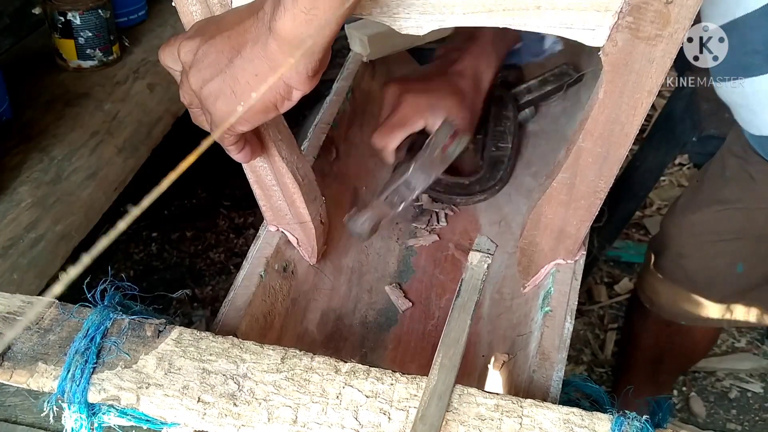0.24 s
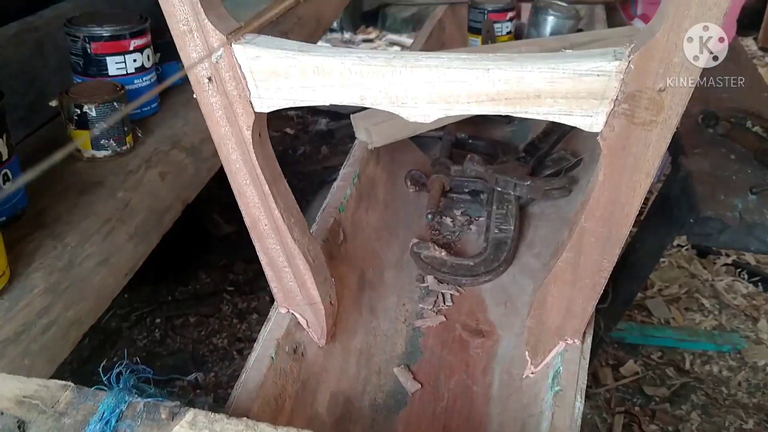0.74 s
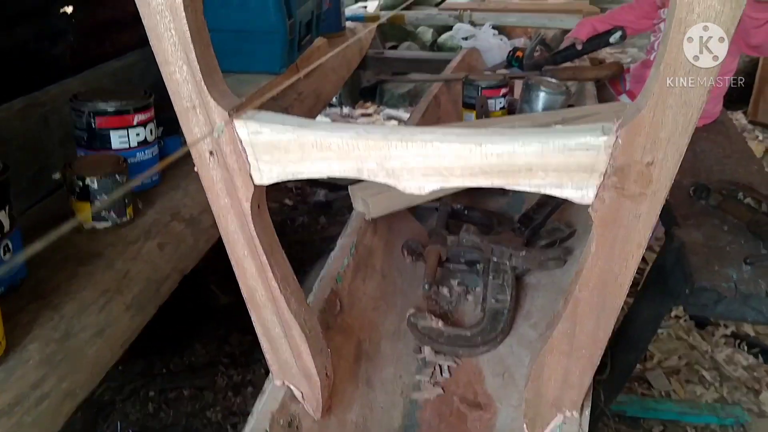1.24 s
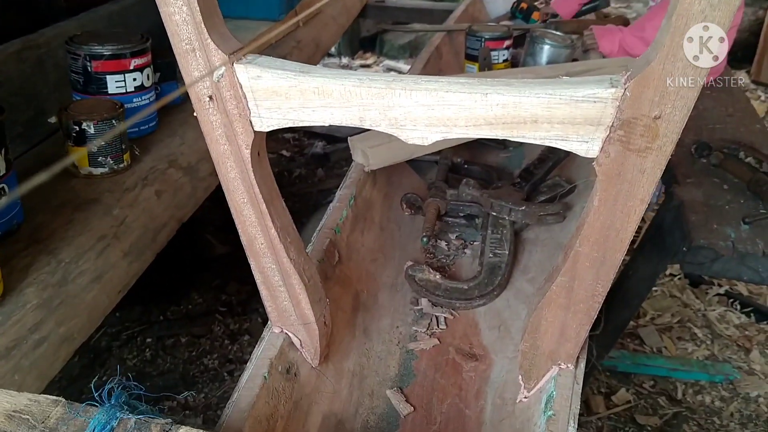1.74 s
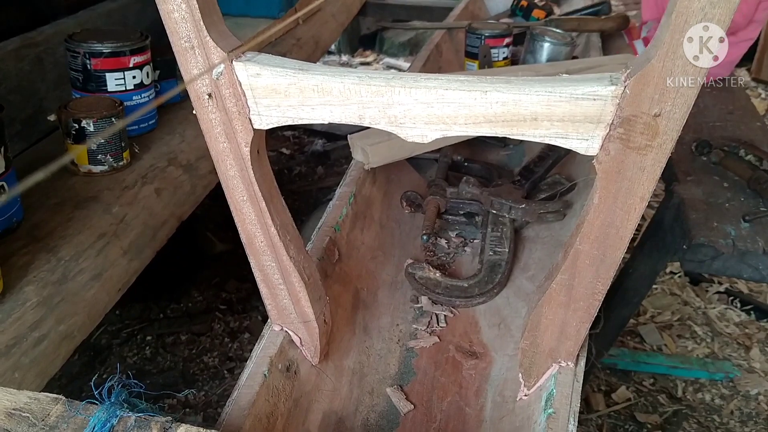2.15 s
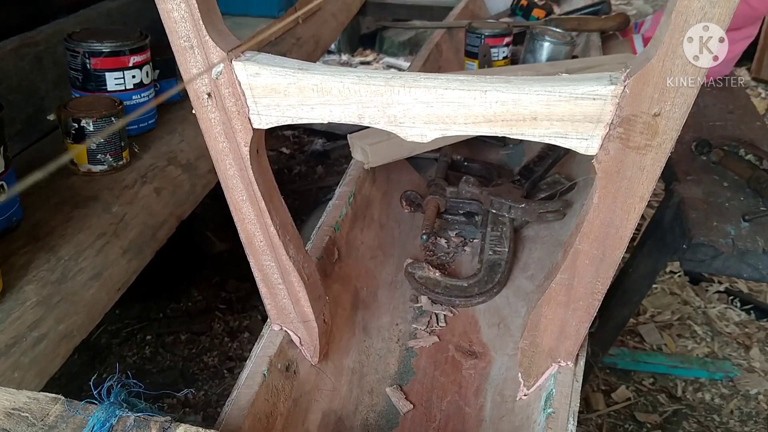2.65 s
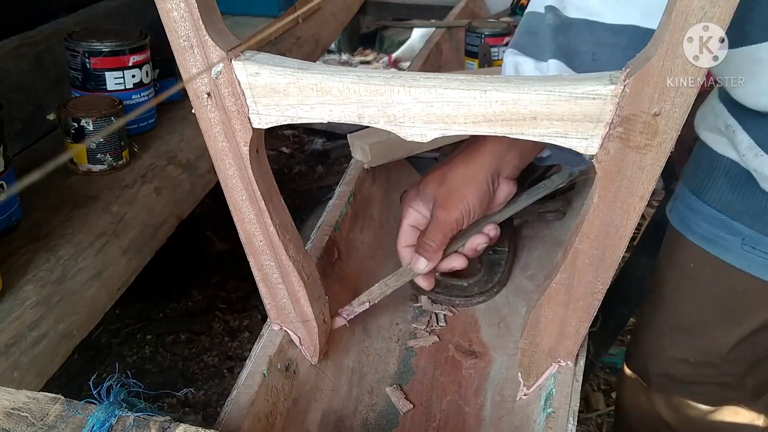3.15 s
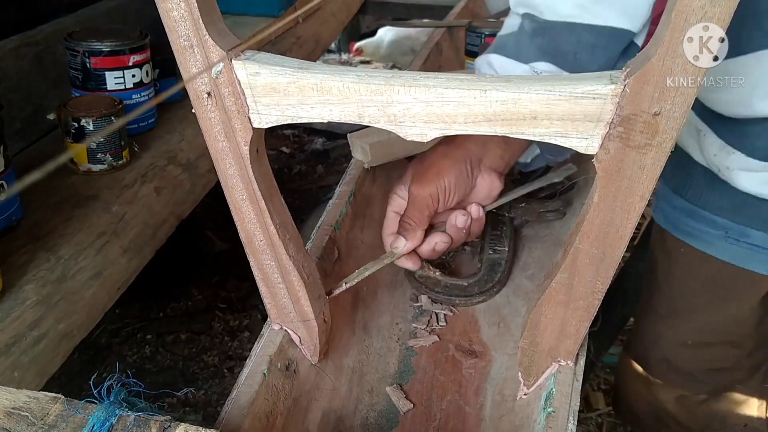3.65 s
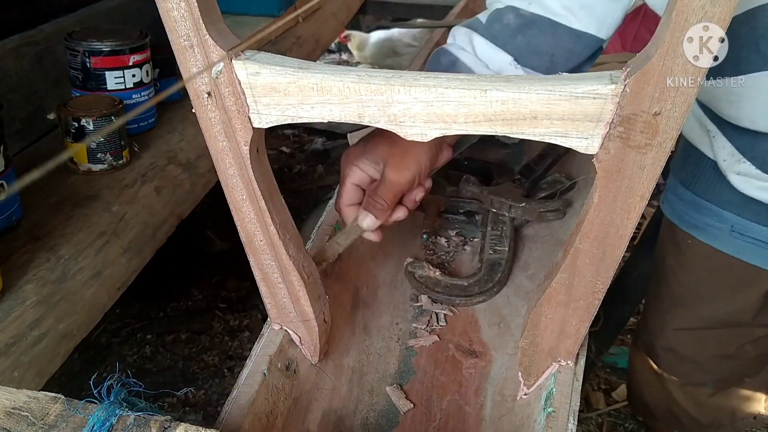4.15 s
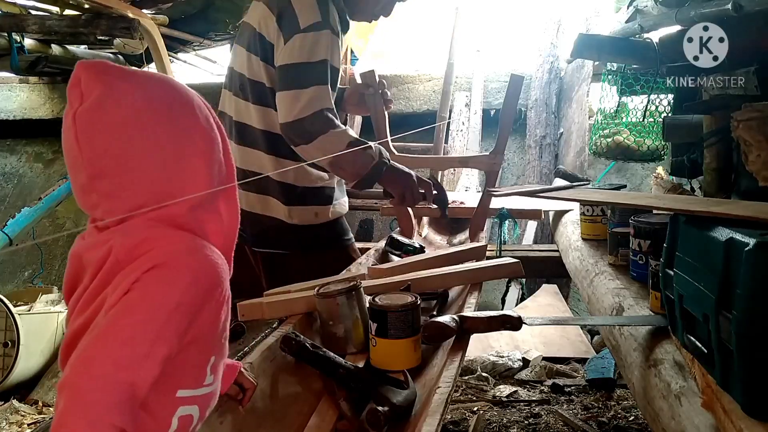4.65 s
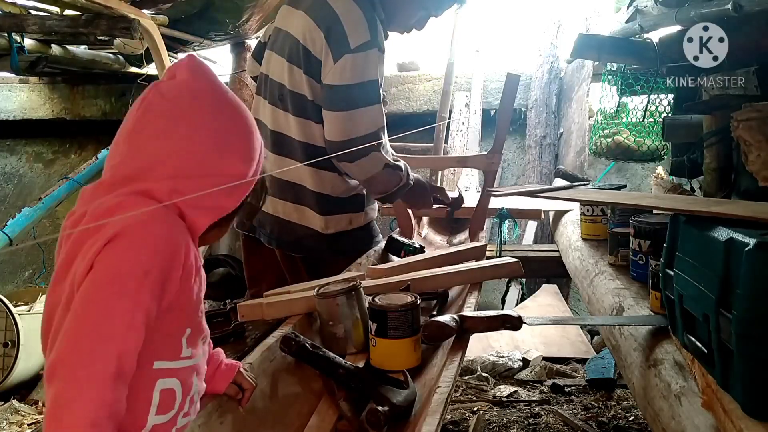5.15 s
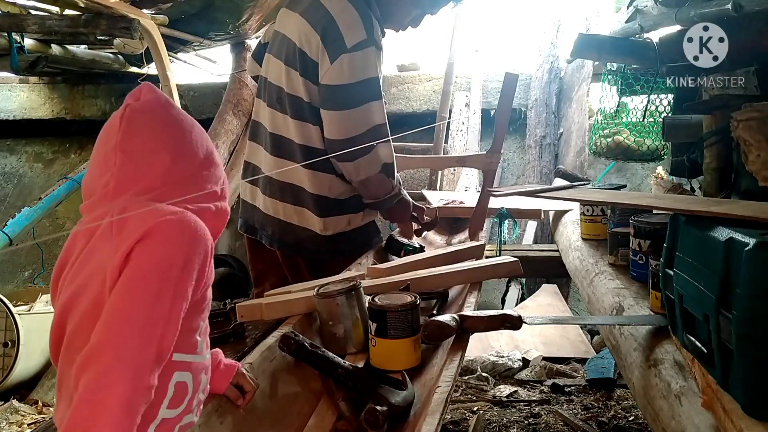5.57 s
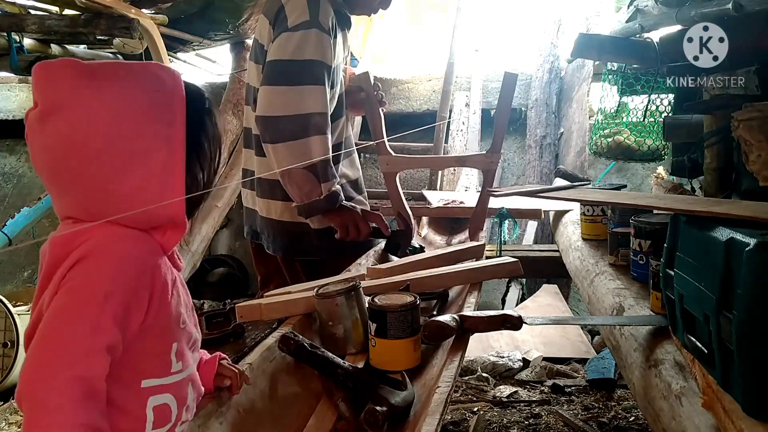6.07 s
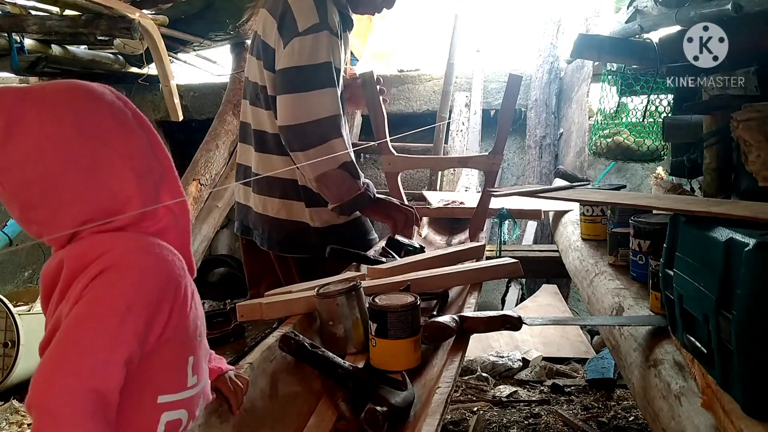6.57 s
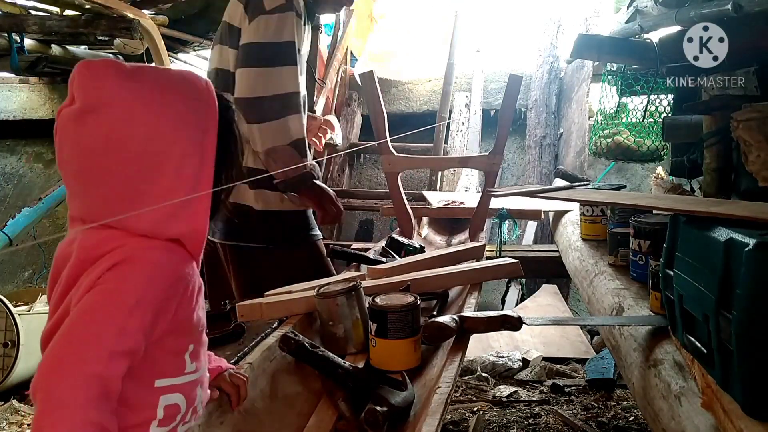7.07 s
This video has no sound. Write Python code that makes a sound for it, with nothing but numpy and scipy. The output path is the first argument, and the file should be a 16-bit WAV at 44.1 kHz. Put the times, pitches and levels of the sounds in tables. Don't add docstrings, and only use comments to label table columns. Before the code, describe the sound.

Two sharp hammer blows, loose woody clatter and tool taps, then a short run of heavier strikes, close up in a quiet breezy yard.

```python
import sys
import numpy as np
from scipy import signal
from scipy.fft import rfft, irfft
from scipy.io import wavfile
from scipy.ndimage import uniform_filter1d, minimum_filter1d, map_coordinates

SR = 44100
rng = np.random.default_rng(int(sys.argv[2]) if len(sys.argv) > 2 else 0)


def boost(x):
    u = np.asarray(x, float) / 20
    return 10 ** u


def pcm_store(signal):
    levels = np.round(np.clip(np.atleast_2d(signal), -1, 1) * 32767)
    wavfile.write(sys.argv[1], SR, levels.astype(np.int16).T)


N = 322621

# frequency in Hz, width in Hz, level in dB.
PLANK = [(1180, 60, 10), (1850, 25, -5), (2050, 33, -21), (2360, 38, 2), (2680, 50, -14), (4160, 40, -17),
         (5800, 35, -14)]
# frequency in Hz, level in dB per Hz.
PLANK_TONE = [(120, -85), (200, -19.5), (353, -5.5), (601, -13.5), (1210, -16), (2050, -11.5), (2610, -17),
              (14900, -50.5), (16000, -46)]
# frequency in Hz, level in dB per Hz.
BENCH_TONE = [(120, -45), (200, 5), (1300, -2.5), (2650, -6.5), (3690, -13), (9060, -26.5), (11300, -30),
              (14900, -31), (16000, -23)]
# frequency in Hz, level in dB per Hz.
SCRAPE_TONE = [(290, -30), (500, -13), (621, -22), (1060, -13), (3590, -6.5), (10100, -34), (14900, -31),
               (16000, -34)]
# frequency in Hz, width in Hz, level in dB.
SCRAPE_PEAKS = [(1880, 87, 3), (2090, 34, -7), (2450, 32, 0), (3550, 99, -3), (4030, 48, -12),
                (4540, 99, 0)]
# frequency in Hz, level in dB per Hz.
HISS = [(2940, -30), (5000, -4.5), (6570, -12), (8050, -7.5), (12000, -13.5), (15000, -7), (15900, -9),
        (16400, -57)]
# frequency in Hz, level in dB, t60 in seconds.
BEAM_FIRST = [(775, -15, 5.0), (1254, -8, 0.45), (2288, 0, 0.08), (2710, -3, 0.064), (3047, -14, 0.17),
              (3402, -11, 0.17), (4000, -6, 0.1), (4177, -9, 0.061)]
BEAM_SECOND = [(883, -5, 2.3), (1405, -4, 0.3), (2116, 0, 0.098), (2358, 0, 0.11), (2751, -2, 0.075),
               (3370, -4, 0.12), (3892, -13, 0.29), (4495, -11, 0.12)]
BEAM_THIRD = [(1400, 1, 0.13), (1954, -9, 0.095), (2358, -1, 0.087), (2902, -7, 0.11), (3165, -7, 0.11),
              (3350, -14, 1.7), (4032, -6, 0.1), (4899, -10, 0.072)]
TOOL_MODES = [(1238, 0, .07), (1384, -4, .07), (1938, -1, 0.088), (2837, -5, 0.089), (3130, -4, .06),
              (3603, 4, 0.067), (4441, -2, 0.097), (6770, -1, .035), (8300, -8, .03)]
CLIP_MODES = [(1147, -3, 0.031), (1733, -11, 0.042), (3050, 0, 0.023), (4479, -7, 0.063), (6158, -28, 5.0),
              (7278, -20, 0.023)]
PEG_MODES = [(4210, -11, 0.068), (5066, 0, 0.0091), (5475, -14, 0.069), (6169, -6, 0.029),
             (7900, -17, 0.046)]
NAIL_FIRST = [(1500, 0, .04), (4600, 4, .06), (6150, 0, .06), (6767, 0, .04), (7461, -5, .03),
              (9426, 0, .031), (12660, -2, .035)]
NAIL_SECOND = [(1599, 0, 0.034), (2105, -7, 0.055), (6040, -16, 0.19), (9399, -2, 0.097),
               (10450, -21, 0.081), (12600, -10, 0.029)]
BLOCK_FIRST = [(1357, -0.5, 0.055), (1700, -2, .06), (2724, -7, .07), (3472, -7.5, 0.043), (3740, -10, .04)]
BLOCK_SECOND = [(1637, -0.5, 0.05), (3020, -8, 0.048), (3575, -20, 0.071), (4253, -24, 0.06)]
RAP_FIRST = [(1179, 0, 0.033), (1825, -13, 0.073), (2051, -18, 5.0), (2805, -3, 0.018), (3736, -6, 0.013),
             (4037, -26, 0.089)]
RAP_SECOND = [(1061, -3, 0.13), (1820, 0, 0.062), (2422, -17, 0.32), (4102, -10, 0.014)]


def unit(x):
    return x / np.sqrt(np.mean(x ** 2) + 1e-20)


def along(points, hz):
    f, v = np.transpose(points)
    return np.interp(np.log(hz + 1), np.log(f + 1), v)


def curves(rows):
    s, *cols = np.transpose(rows)
    return [np.interp(np.arange(N) / SR, s, c) for c in cols]


def wobble(rate, count=N):
    knots = rng.standard_normal(int(count * rate / SR) + 4)
    return map_coordinates(knots, [np.arange(count) * rate / SR])


def causal(gain):
    cepstrum = irfft(np.log(gain + 1e-6))
    half = len(cepstrum) // 2
    cepstrum[1:half] *= 2
    cepstrum[half + 1:] = 0
    return np.exp(rfft(cepstrum))


def rush(spectrum, patchy_db):
    hz, _, z = signal.stft(rng.standard_normal(N + 512), SR, nperseg=512)
    field = uniform_filter1d(rng.standard_normal(z.shape), size=6, axis=0)
    field = uniform_filter1d(field, size=10, axis=1)
    z = z * boost(patchy_db * unit(field) + along(spectrum, hz)[:, None])
    return unit(signal.istft(z, SR, nperseg=512)[1][:N])


def strikes(rows, modes, tone, bass_db, ring_s, ring_db, bend, rattle_db, treble_life, attack, blow=6,
            damping_hz=45):
    bass_lag = 0.49
    bright_lasts = 0.014
    out, t = np.zeros(N + SR), np.arange(5120) / SR
    f = np.fft.rfftfreq(2 * len(t), 1 / SR)

    def peak(hz, width):
        return f * width / np.abs(hz * hz - f * f + 1j * f * width)

    high = 1 / (1 + (3000 / (f + 1)) ** 6)
    low = 1 / (1 + (f / 700) ** 6)
    for s, db, main_hz, treble_db in rows:
        t60 = ring_s * (1 + bright_lasts * treble_db)
        thump_db = bass_db - bass_lag * (db + 30)
        lift = 0
        for hz, width, level_db in modes:
            mode_gain = boost(level_db - along(tone, hz) + rng.normal(0, 0.58))
            lift = lift + mode_gain * peak(hz, width + damping_hz)
        lift = lift / len(modes) + 1.07 * peak(main_hz, 120)
        colour = boost(along(tone, f)) * (1 + boost(ring_db) * lift)
        bands = ((low, thump_db, 1.2), (1 - low - high, 0, 1.01), (high, treble_db, treble_life))
        for band, rel_db, life in bands:
            fade = boost(-60 * (t / (t60 * life)) ** bend) * (1 - np.exp(-t / attack))
            rattle = boost(rattle_db * wobble(334, count=len(t)))
            shake = fade * rattle * rng.standard_normal(len(t))
            shake[round(attack * SR) + 2] += blow
            sound = irfft(rfft(shake, 2 * len(t)) * causal(colour * band))[:len(t)]
            loudest = np.sqrt(uniform_filter1d(sound ** 2, size=260).max())
            out[round(s * SR):][:len(t)] += boost(db + rel_db - 6.5) * sound / loudest
    return out[:N]


def frame_blows():
    # start in seconds, peak in dB, main resonance in Hz, treble in dB.
    near = [
        (0.146, -10.5, 1170, -4.5),
        (0.155, -13, 1250, -5.5),
        (0.311, -8.5, 1180, -8),
        (0.321, -10, 1250, -7),
    ]
    # frequency in Hz, width in Hz, level in dB.
    frame = [(1250, 31, 0), (1500, 15, 7.5), (2360, 31, -15), (2780, 180, -1.5), (3550, 57, -21),
             (3840, 44, -35), (4100, 46, -34), (4740, 42, -24), (8200, 83, -28), (9300, 100, -19)]
    # frequency in Hz, level in dB per Hz.
    frame_tone = [(59, -82), (100, -38), (315, 2), (950, -13.5), (1250, -11.5), (2170, -13.5), (3780, -20),
                  (7610, -37), (15000, -46), (16000, -49)]
    return strikes(near, frame, frame_tone, bass_db=-5.5, ring_s=0.09, ring_db=4, bend=1.95,
                   rattle_db=0.0, treble_life=1.0, attack=0.00011)


def tighten():
    # start in seconds, start in Hz, end in Hz, level in dB, length in seconds.
    glides = [
        (.146, 1080, 1370, -17, 0.0229),
        (0.309, 1063, 1500, -21.5, 0.0135),
    ]
    out = np.zeros(N)
    for s, start_hz, end_hz, db, length in glides:
        u = np.linspace(0, 1, int(length * SR))
        phase = 2 * np.pi * np.cumsum(start_hz + (end_hz - start_hz) * u) / SR
        out[round(s * SR):][:len(u)] += boost(db + 3) * np.sqrt(1 - u ** 3) * np.sin(phase)
    return out


def beam_blows():
    # start in seconds, peak in dB, main resonance in Hz, treble in dB.
    drive = [
        (5.51, -8.5, 1240, -5.5),
        (5.687, -8.5, 1240, -6),
    ]
    glance = [
        (5.3245, -8.5, 860, -3),
    ]
    rebound = [
        (5.37, -23.5, 1150, -1.8),
    ]
    # frequency in Hz, width in Hz, level in dB.
    beam = [(1250, 59, -27), (1530, 17, 19), (2140, 48, 7), (2270, 57, 21), (2740, 22, -15), (3460, 86, 19),
            (4170, 50, 10), (4150, 97, 9), (4780, 47, -9), (5350, 42, 2)]
    # frequency in Hz, level in dB per Hz.
    beam_tone = [(59, -49), (100, -33), (328, -2.5), (1250, -0.5), (1760, -7.5), (2320, -3.5), (3400, -7.5),
                 (7610, -27), (15000, -36), (16000, -60)]
    hits = strikes(drive, beam, beam_tone, bass_db=0, ring_s=.1, ring_db=-16, bend=1.45,
                   rattle_db=2.5, treble_life=0.96, attack=0.0005)
    swell = strikes(glance, beam, beam_tone, bass_db=-1, ring_s=0.097, ring_db=-13, bend=1.46,
                    rattle_db=1.0, treble_life=0.83, attack=0.004, blow=0)
    bounce = strikes(rebound, beam, beam_tone, bass_db=-17, ring_s=0.046, ring_db=-13, bend=1.3,
                     rattle_db=4.0, treble_life=0.93, attack=0.00045)
    return hits + swell + bounce


def cracks():
    # start in seconds, peak in dB, frequency in Hz.
    snaps = [
        (2.6236, -19, 4200),
        (4.5716, -17, 2500),
        (.6878, -28, 4600),
        (5.9385, -26, 5000),
        (6.3585, -28, 6000),
        (.9285, -30, 3500),
        (4.5405, -38, 3300),
        (1.8085, -20, 1900),
        (2.4075, -16, 1700),
    ]
    decay_cycles = 1.3
    out, t = np.zeros(N + SR), np.arange(SR // 100) / SR
    for s, db, hz in snaps:
        swing = np.exp(-hz * t / decay_cycles) * np.sin(2 * np.pi * hz * t)
        out[round(s * SR):][:len(t)] -= boost(db + 3) * swing
    return out[:N]


def chimes():
    # start in seconds, level in dB, swell in seconds, choke in seconds, modes that ring.
    struck = [(5.327, -21, .004, .06, BEAM_FIRST), (5.5105, -22, .002, .065, BEAM_SECOND),
              (5.688, -25.5, 0.0022, .065, BEAM_THIRD), (4.572, -27, 0.0018, .04, TOOL_MODES),
              (.6875, -37, .0004, .022, NAIL_FIRST), (.7028, -37, .0006, .03, NAIL_SECOND),
              (2.4062, -19, 0.0005, .016, BLOCK_FIRST), (2.418, -14.5, .001, 0.032, BLOCK_SECOND),
              (2.623, -35, .0004, .03, CLIP_MODES), (1.757, -42, .0008, .025, PEG_MODES),
              (.924, -29, .001, .04, RAP_FIRST), (1.114, -28, .0008, .03, RAP_SECOND)]
    out, t = np.zeros(N + SR), np.arange(SR // 10) / SR
    for s, db, swell, choke, modes in struck:
        for hz, mode_db, t60 in modes:
            loss_db = 60 * t / np.clip(t60, .01, .12) + 60 * (t / choke) ** 5
            unsteady_db = 1.9 * wobble(250, count=len(t))
            fade = boost(db + mode_db - loss_db + unsteady_db) * (1 - np.exp(-t / swell))
            phase = 2 * np.pi * (hz * t + rng.random()) + .35 * wobble(400, count=len(t))
            out[round(s * SR):][:len(t)] += fade * np.sin(phase)
    return out[:N]


def squeak():
    # start in seconds, length in seconds, slip rate in Hz, level in dB, friction noise share 0-1.
    slips = [
        (0.203, .034, 1100, -32, 0.87),
        (0.234, 0.036, 1076, -33.5, 0.55),
    ]
    # multiple of the slip rate, level in dB.
    orders = [(1, -6), (2, -2), (3, -6), (4, 0), (5, -8), (6, -22), (7, -19), (8, -15)]
    sag, rise = 0.041, 0.23
    out = np.zeros(N)
    grit = boost(3 * wobble(300)) * rush(SCRAPE_TONE, patchy_db=1)
    for s, length, rate_hz, db, share in slips:
        u = np.linspace(0, 1, int(length * SR))
        waver = .04 * share * wobble(700, count=len(u))
        phase = 2 * np.pi * np.cumsum(rate_hz * (1 + sag * (.5 - u) + waver)) / SR
        stack = np.zeros(len(u))
        for k, order_db in orders:
            stack += boost(order_db + 3.5 * wobble(200, count=len(u))) * np.sin(k * phase)
        swell = np.interp(u, [0, rise, 1], [0, 1, 0])
        at = round(s * SR)
        friction = share * grit[at:at + len(u)]
        out[at:at + len(u)] += boost(db) * swell * (unit(stack) + friction)
    return out


def plank_knocks():
    # start in seconds, peak in dB, main resonance in Hz, treble in dB.
    knocks = [
        (0.924, -22, 1500, -15),
        (0.939, -24, 1600, -15),
        (1.114, -22, 1890, -19),
        (1.126, -29.5, 1170, -5.5),
        (1.289, -29.5, 1250, -17),
        (5.101, -45, 2090, -7),
    ]
    return strikes(knocks, PLANK, PLANK_TONE, bass_db=-16.0, ring_s=0.04, ring_db=5, bend=1.57,
                   rattle_db=1.0, treble_life=1.0, attack=0.00035)


def rod_clatter():
    # start in seconds, peak in dB, main resonance in Hz, treble in dB.
    contacts = [(0.0, -22.5, 1240, -5.5), (1.757, -44, 1220, 2.5), (1.785, -21, 1470, -17.5),
                (1.807, -18.5, 2050, -21), (1.859, -38, 1220, -23), (1.889, -49, 1230, 4.5),
                (1.932, -35, 1040, -13.5), (3.798, -19, 1700, -15), (3.834, -30.5, 1140, -0.5),
                (3.859, -33, 1680, -3.5), (3.896, -29.5, 1820, -13), (3.925, -50.5, 1180, 7),
                (4.068, -31.5, 1370, -19), (4.125, -40, 1770, -6), (4.354, -38, 1650, -2.5)]
    # frequency in Hz, width in Hz, level in dB.
    rod = [(750, 13, -2.5), (1170, 81, 5), (1560, 53, 2), (1710, 94, -17), (2060, 99, -15), (2460, 46, -12),
           (2970, 32, -14), (4120, 23, -11), (5450, 73, -23)]
    return strikes(contacts, rod, PLANK_TONE, bass_db=-11.5, ring_s=0.047, ring_db=17.5, bend=1.37,
                   rattle_db=-0.5, treble_life=1.0, attack=0.00037)


def pings():
    # start in seconds, level in dB, upper mode in dB, t60 in seconds.
    bounces = [
        (0, -36, -26, .12),
        (1.128, -54.5, 12, 0.044),
        (1.787, -32.5, -10, 0.03),
        (1.809, -36.5, -11, 0.043),
        (2.428, -44, -16, 0.1),
        (3.798, -36, -3, 0.047),
        (3.835, -56, 16, .14),
        (3.889, -41, -11, 0.046),
        (3.927, -37, -18, 0.049),
    ]
    # start in seconds, frequency in Hz, level in dB, t60 in seconds.
    rings = [
        (.163, 8200, -34, .04),
        (0.18, 9350, -36, .04),
        (2.406, 4000, -33, 0.038),
        (1.787, 3350, -36, .03),
        (1.858, 1230, -37, .07),
        (1.932, 2250, -38, .03),
        (1.893, 7250, -50, .05),
        (5.945, 1450, -57.5, 1.4),
        (6.3805, 1700, -20, 0.024),
        (5.137, 530, -27.5, .022),
    ]
    blur_rad, blur_hz = .2, 25000
    out, t = np.zeros(N + SR), np.arange(SR // 3) / SR
    single_modes = list(rings)
    for s, db, upper_db, t60 in bounces:
        single_modes += [(s, 4370, db, t60), (s, 5750, db + upper_db, t60)]
    for s, hz, db, t60 in single_modes:
        unsteady_db = 2.5 * wobble(250, count=len(t))
        fade = boost(db - 60 * t / t60 + unsteady_db) * (1 - np.exp(-t / 0.00065))
        phase = 2 * np.pi * hz * t + (blur_rad + hz / blur_hz) * wobble(600, count=len(t))
        out[round(s * SR):][:len(t)] += fade * np.sin(phase)
    return out[:N]


def bench_contacts():
    # start in seconds, peak in dB, main resonance in Hz, treble in dB.
    taps = [
        (2.623, -33, 1180, 5),
        (4.185, -42, 2360, 5.5),
        (4.508, -54, 1570, -3),
        (4.539, -40, 1600, -4),
        (4.608, -36.5, 2650, -8),
        (4.699, -43.5, 1180, -2.5),
        (5.207, -41, 2450, -11),
        (5.263, -40, 1920, -4),
        (6.358, -25.5, 1180, -0.5),
        (6.38, -20, 1500, -4),
            (2.394, -42, 2500, 1),
    ]
    slaps = [
        (4.571, -18.5, 1240, 1),
        (5.938, -24, 1310, 1.5),
    ]
    # frequency in Hz, width in Hz, level in dB.
    bench = [(1240, 460, -27), (1920, 68, 8), (3350, 33, -9), (3560, 840, 7.5), (4550, 130, 0),
             (5330, 39, 3), (6190, 95, -32), (6450, 130, -5), (8800, 120, -7)]
    tapping = strikes(taps, bench, BENCH_TONE, bass_db=-15, ring_s=0.054, ring_db=1, bend=1.08,
                      rattle_db=-1, treble_life=0.95, attack=0.0003, blow=4.9)
    slapping = strikes(slaps, bench, BENCH_TONE, bass_db=-17.5, ring_s=0.06, ring_db=10, bend=1.35,
                       rattle_db=1.0, treble_life=0.73, attack=0.0014, blow=0)
    return tapping + slapping


def nail_clink():
    # start in seconds, peak in dB, main resonance in Hz, treble in dB.
    nails = [
        (0.6875, -34, 1530, 5.3),
        (0.7028, -35, 1560, 1),
    ]
    # frequency in Hz, width in Hz, level in dB.
    steel = [(1570, 42, -2), (4470, 45, 16), (5970, 34, 0), (6070, 35, 14), (6750, 54, 15),
             (9440, 42, 16.5), (10000, 25, -15), (12650, 130, 12)]
    return strikes(nails, steel, BENCH_TONE, bass_db=-24, ring_s=0.036, ring_db=-4, bend=1.3,
                   rattle_db=4.5, treble_life=1.1, attack=0.00026)


def block_drop():
    # start in seconds, peak in dB, main resonance in Hz, treble in dB.
    drops = [
        (2.4055, -16.5, 1380, -7),
        (2.418, -19, 1640, -6.5),
    ]
    # frequency in Hz, width in Hz, level in dB.
    block = [(1370, 24, -12), (1640, 33, 7), (2950, 54, -9), (3500, 29, -7), (4250, 72, -34),
             (5670, 29, -19)]
    # frequency in Hz, level in dB per Hz.
    block_tone = [(120, -55), (200, -22), (590, -28), (763, -12.5), (899, -21), (1650, -10.5),
                  (2020, -13.5), (3070, -15), (16000, -77)]
    return strikes(drops, block, block_tone, bass_db=-14, ring_s=.04, ring_db=3, bend=1.9,
                   rattle_db=2, treble_life=1.1, attack=.0008, blow=3)


def box_setdown():
    # start in seconds, peak in dB, main resonance in Hz, treble in dB.
    setdown = [
        (5.137, -16, 930, -18),
    ]
    # frequency in Hz, width in Hz, level in dB.
    box = [(522, 87, 4), (930, 100, -9), (1370, 75, 5), (1650, 140, 7), (2200, 410, -14)]
    # frequency in Hz, level in dB per Hz.
    box_tone = [(120, -46), (200, -32), (424, -12), (950, -0.5), (1180, -17.5), (2610, -6), (3070, -25),
                (4520, -25.5), (16000, -59)]
    return strikes(setdown, box, box_tone, bass_db=1, ring_s=0.041, ring_db=3, bend=1.13,
                   rattle_db=1.5, treble_life=3.0, attack=0.00071)


def catches():
    # start in seconds, peak in dB, main resonance in Hz, treble in dB.
    ticks = [(4.475, -51, 3550, -2), (4.494, -46, 3100, -2), (4.501, -46, 2000, 0), (4.512, -43, 3100, 1),
             (4.542, -37, 3170, -1), (5.224, -44, 1200, -4), (5.236, -46, 2450, -4), (5.291, -45, 2200, -3),
             (5.305, -45, 1900, -5), (5.322, -23, 1500, -12), (5.374, -26, 1600, -7),
             (5.391, -35, 1900, -12), (5.545, -27.5, 5500, -0.5), (5.567, -33.5, 1150, -15)]
    return strikes(ticks, SCRAPE_PEAKS, BENCH_TONE, bass_db=-19, ring_s=.03, ring_db=9, bend=1.2,
                   rattle_db=2.5, treble_life=0.8, attack=0.00069, blow=3)


def nudges():
    # start in seconds, peak in dB, main resonance in Hz, treble in dB.
    bumps = [
        (1.791, -26, 1600, -20),
        (1.823, -37, 1250, -20),
        (1.855, -40, 1900, -15),
        (1.938, -35.5, 1000, -20),
        (1.945, -39, 480, -25),
    ]
    return strikes(bumps, PLANK, PLANK_TONE, bass_db=-8.5, ring_s=0.028, ring_db=9, bend=1.3,
                   rattle_db=1.5, treble_life=.8, attack=0.00081, blow=4)


def scrapes():
    # start in seconds, end in seconds, level in dB.
    drags = [
        (4.472, 4.524, -48),
        (4.521, 4.576, -51),
        (5.16, 5.202, -51),
        (5.197, 5.262, -46),
        (5.255, 5.32, -48),
    ]
    t, f = np.arange(N) / SR, np.fft.rfftfreq(N, 1 / SR)
    stroke = np.zeros(N)
    for start, end, db in drags:
        progress = ((t - start) / (end - start)).clip(0, 1)
        stroke += boost(db) * np.sin(np.pi * progress) ** .3
    lift = 1
    for hz, width, level_db in SCRAPE_PEAKS:
        lift = lift + boost(level_db + 3) / (1 + ((f - hz) / (.4 * width)) ** 2)
    grit = boost(4 * wobble(500)) * rush(SCRAPE_TONE, patchy_db=1)
    return boost(-0.5) * stroke * unit(irfft(rfft(grit) * lift, N))


def chaff():
    # start in seconds, length in seconds, level in dB.
    crackles = [
        (2.288, .008, -59.5),
        (2.564, .012, -59),
        (2.631, 0.031, -45.5),
        (2.682, .007, -57),
        (2.875, 0.0047, -62),
        (3.05, 0.047, -54.5),
        (4.24, .008, -56),
        (4.395, 0.052, -63),
        (6.375, 0.033, -53),
    ]
    t = np.arange(N) / SR
    stroke = np.zeros(N)
    for s, length, db in crackles:
        progress = ((t - s) / length).clip(0, 1)
        stroke += boost(db) * np.sin(np.pi * progress ** 0.67) ** 2
    return stroke * boost(2.7 * wobble(400)) * rush(HISS, patchy_db=5)


def shed(x):
    t = np.arange(SR // 3) / SR
    tail = signal.lfilter([.4], [1, -.6], rng.standard_normal(len(t))) * boost(-60 * t / 0.15)
    return signal.fftconvolve(x, tail / np.linalg.norm(tail))[:N]


def thuds():
    # start in seconds, peak in dB, frequency in Hz, t60 in seconds.
    footfalls = [
        (2.683, -44.5, 258, 0.049),
        (3.685, -36, 228, 0.027),
    ]
    out, t = np.zeros(N + SR), np.arange(SR // 5) / SR
    for s, db, hz, t60 in footfalls:
        fade = boost(db + 12 - 60 * t / t60) * (1 - np.exp(-(t / 0.0035) ** 2))
        phase = 2 * np.pi * hz * t + 1.0 * wobble(240, count=len(t))
        out[round(s * SR):][:len(t)] += fade * np.sin(phase)
    return out[:N]


def peeps():
    # start in seconds, length in seconds, start in Hz, end in Hz, level in dB.
    calls = [
        (2.165, 0.033, 6060, 6500, -61),
        (6.065, .045, 6700, 6650, -63),
        (6.55, 0.046, 5970, 6150, -59),
        (6.934, 0.05, 5840, 6600, -65),
    ]
    out = np.zeros(N + SR)
    for s, length, start_hz, end_hz, db in calls:
        u = np.linspace(0, 1, int(length * SR))
        hz = (start_hz + (end_hz - start_hz) * u) * (1 + .03 * wobble(700, count=len(u)))
        level = boost(db - 1.5 + 4.7 * wobble(300, count=len(u)))
        swell = np.sqrt(np.sin(np.pi * u).clip(0))
        out[round(s * SR):][:len(u)] += level * swell * np.sin(2 * np.pi * np.cumsum(hz) / SR)
    return out[:N]


def yard():
    # time in seconds, level in dB.
    breeze = [(0.0, -56), (0.22, -57), (0.49, -59), (0.71, -58), (1.14, -53.5), (1.73, -58), (1.89, -55),
              (2.97, -56), (3.12, -53), (3.67, -55), (4.4, -54.5), (4.83, -58), (5.15, -58.5), (5.36, -57),
              (5.52, -58.5), (6.89, -59), (7.32, -57)]
    # centre in seconds, half length in seconds, level in dB.
    motors = [
        (3.35, 0.41, -53),
        (5.356, .12, -63),
    ]
    # frequency in Hz, level in dB per Hz.
    rumble_tone = [(24, -85), (40, -64), (123, -50), (199, 5.5), (253, -2.5), (444, -9), (614, -22.5),
                   (700, -49), (910, -24), (1540, -120)]
    drone_tone = [(260, -31), (450, -3.5), (747, -0.5), (962, -3), (1410, -0.5), (1900, -11), (2470, -28),
                  (4180, -120)]
    rustle_tone = [(1000, -31), (1700, -3.5), (1830, -1.5), (4130, -6.5), (7000, -16.5), (9100, -29),
                   (15400, -120)]
    breeze_db, = curves(breeze)
    t, gust_db = np.arange(N) / SR, breeze_db - breeze_db.mean()
    motor = sum(boost(db) * np.exp(-((t - s) / half) ** 4) for s, half, db in motors)
    flutter = wobble(24)
    rumble = boost(-56 + 0.37 * gust_db + 1.1 * wobble(25)) * rush(rumble_tone, patchy_db=0.5)
    drone_level = np.hypot(boost(-57.0 + 0.76 * gust_db), motor) * boost(1.0 * flutter)
    drone = drone_level * rush(drone_tone, patchy_db=1.5)
    rustle = boost(-58 + 0.99 * gust_db + 0.68 * flutter) * rush(rustle_tone, patchy_db=1.0)
    hiss = boost(-69.5 + 0.78 * gust_db + 1.2 * flutter) * rush(HISS, patchy_db=1.0)
    hiss = signal.sosfilt(signal.cheby2(8, 30, 15800, fs=SR, output="sos"), hiss)
    dip_s, dip_half_s, dip_db = 0.675, 0.043, 7.5
    dip = boost(-dip_db * np.exp(-((t - dip_s) / dip_half_s) ** 2))
    return dip * (rumble + drone + rustle + hiss)


def scene():
    hammering = frame_blows() + tighten() + beam_blows() + cracks() + chimes() + squeak()
    tools = plank_knocks() + rod_clatter() + pings() + bench_contacts() + nail_clink()
    tools = tools + block_drop() + box_setdown() + catches() + nudges()
    work = hammering + tools + scrapes() + chaff()
    work = signal.sosfilt(signal.cheby2(10, 26, 15900, fs=SR, output="sos"), work)
    return (work + boost(-21.5) * shed(work) + thuds() + peeps() + yard())[None]


def roll_off(x):
    return signal.sosfilt(signal.butter(12, 16520, fs=SR, output="sos"), x)


def record(dry):
    thin = signal.sosfilt(signal.butter(5, 130, "high", fs=SR, output="sos"), dry)
    needed = np.minimum(1, .4 / (np.abs(thin) + 1e-9))
    gain = uniform_filter1d(minimum_filter1d(needed, size=61), size=41)
    held = signal.sosfilt(signal.butter(1, 70, "high", fs=SR, output="sos"), thin * gain)
    return roll_off(held)


dry = scene()
out = record(dry)
pcm_store(out)
```